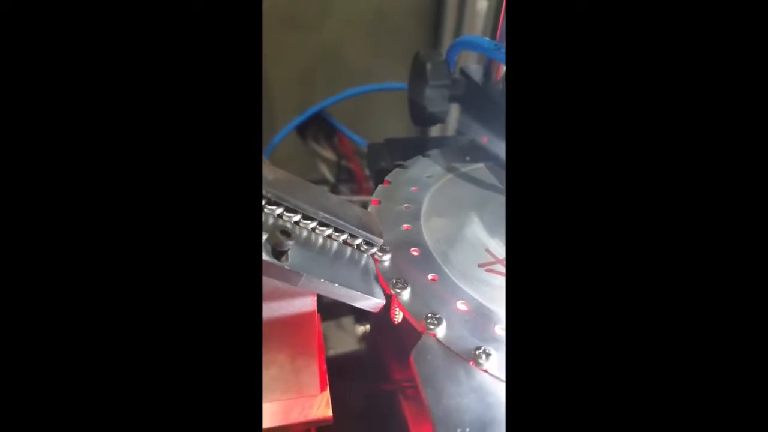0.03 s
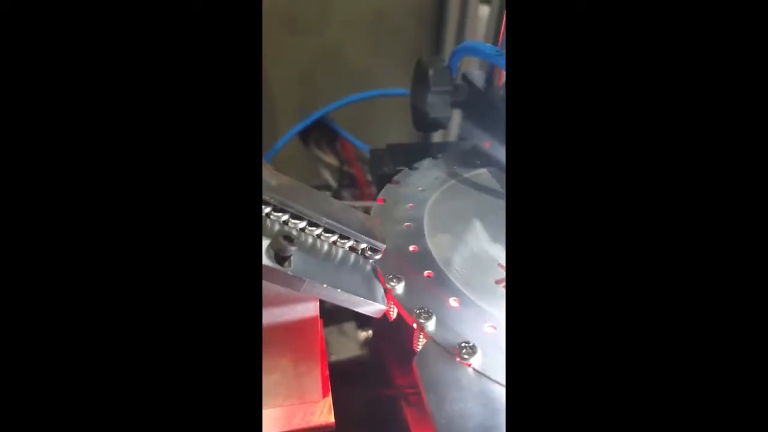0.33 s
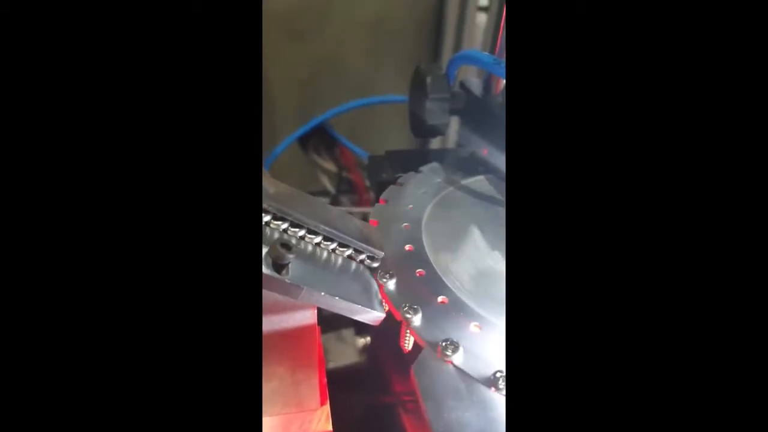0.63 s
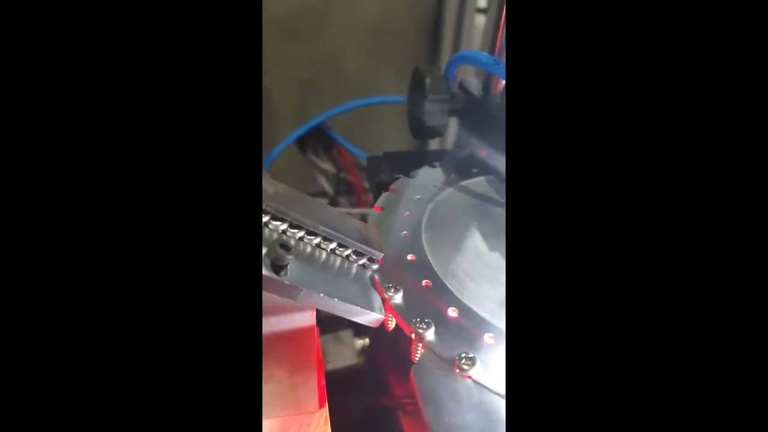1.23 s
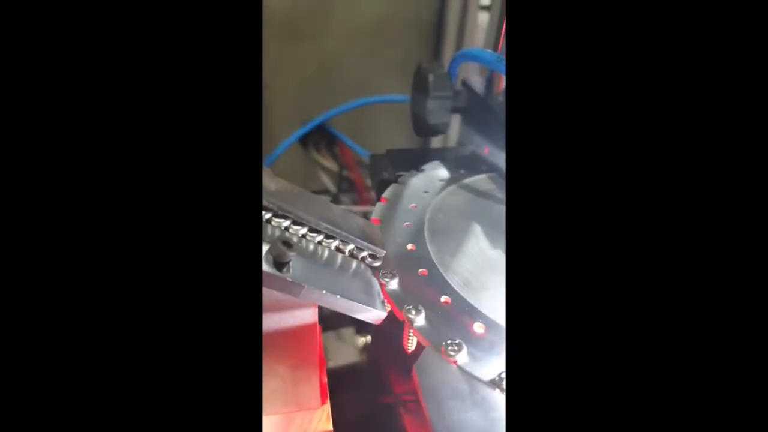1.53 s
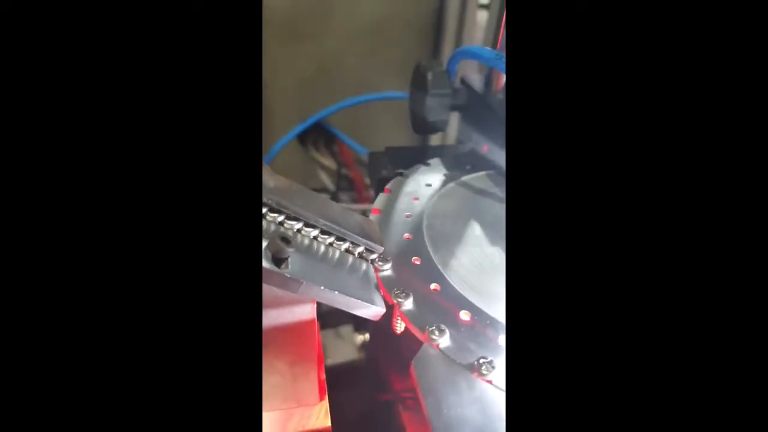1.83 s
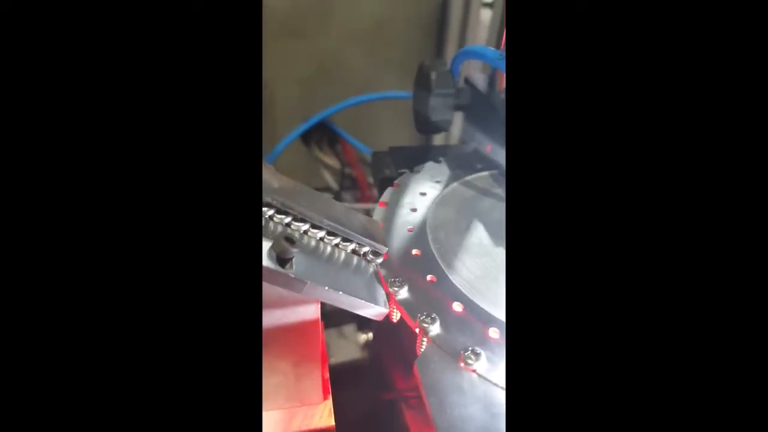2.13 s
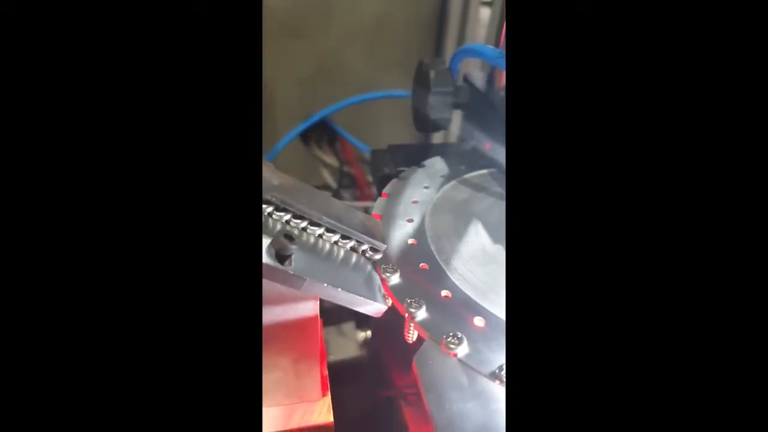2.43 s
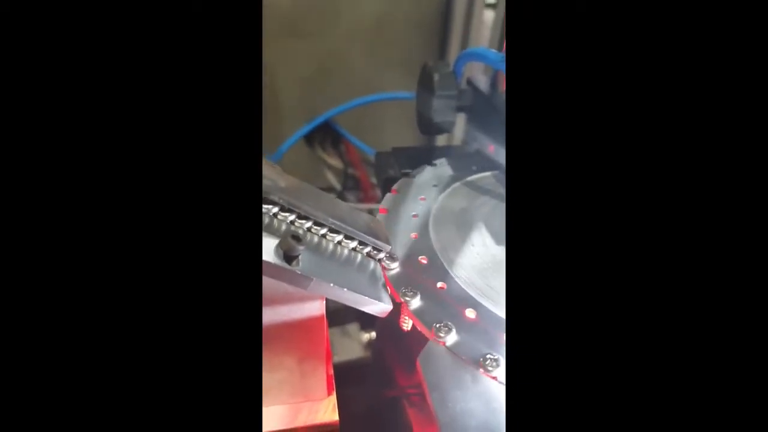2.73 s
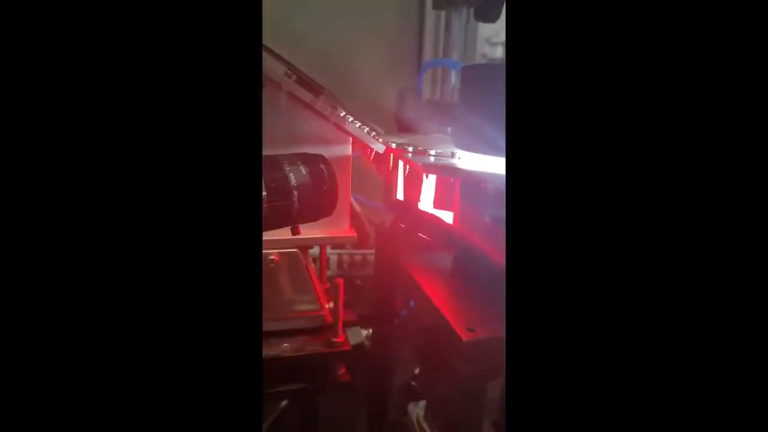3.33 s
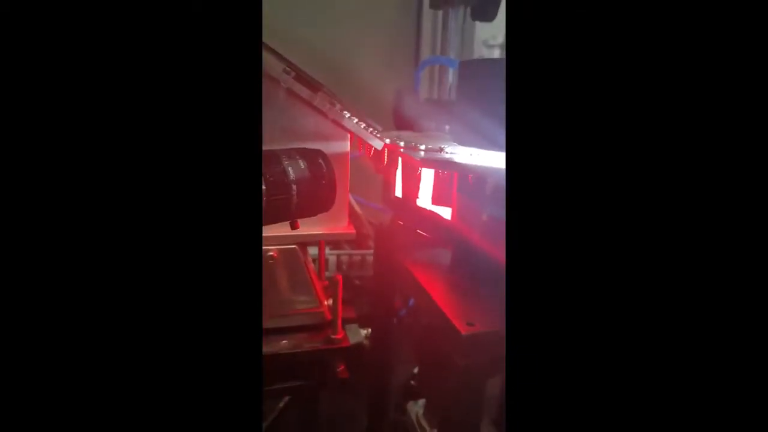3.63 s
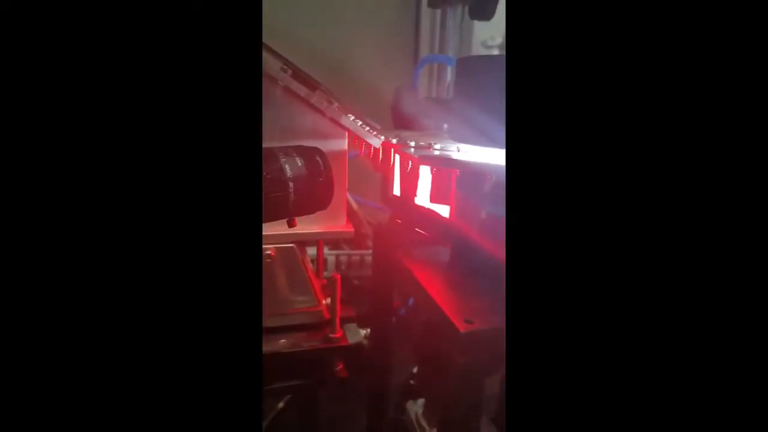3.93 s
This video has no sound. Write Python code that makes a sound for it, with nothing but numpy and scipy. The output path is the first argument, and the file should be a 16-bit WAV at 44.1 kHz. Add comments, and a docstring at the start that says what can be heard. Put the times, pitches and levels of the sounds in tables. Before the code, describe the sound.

A parts-sorting machine hums and throbs close to the microphone, over a rumble and steady rushing air. Sharp air puffs and tiny steel parts clattering into chutes come thickly at first, then sparsely, echoing briefly in the metal housing.

```python
"""The vibrating feeders and the motor of a parts-sorting machine hum and throb, close by.
The throb comes from two tones so near in pitch that they drift in and out of step.
Air jets puff and tiny steel parts clatter into chutes, both echoed by the metal housing.
Behind them the shaken frame rumbles, air rushes and parts shuffle along a track.
At three seconds the whole sound dips briefly."""
import sys
import numpy as np
from scipy import signal
from scipy.fft import rfft, irfft, next_fast_len
from scipy.io import wavfile
from scipy.ndimage import map_coordinates

SR = 44100
rng = np.random.default_rng(int(sys.argv[2]) if len(sys.argv) > 2 else 0)


def transcribe(u):
    """Save the signal u as a 16-bit wav file named by the first command-line argument.

    u: samples, shape (n,) or (channels, n), limited to [-1, 1]; the rate is SR.
    q: integer samples, one column per channel.
    """
    v = np.clip(np.atleast_2d(u).T, -1, 1)
    q = np.round(v * 32767).astype(np.int16)
    wavfile.write(sys.argv[1], SR, q)


N = 176400

# Levels are relative. A fade is the time to drop 60 dB; a rise is the time to climb the last 9 dB.
# loudness of the main feeder, slower feeder, motor and motor's octave (t/s, level/dB)
FEEDER_LEVEL = [(0, -29), (.4, -22), (.62, -32), (1.0, -32), (1.12, -48), (1.4, -51), (1.58, -39),
                (1.92, -40), (2.1, -34.5), (2.32, -25), (2.38, -35.5), (2.5, -29.5), (2.7, -28.5),
                (2.95, -32.5), (3.04, -37.5), (3.45, -47), (3.7, -37), (4, -41)]
SLOW_FEEDER_LEVEL = [(0, -39), (.45, -38), (.62, -24.5), (.98, -28), (1.1, -37.5), (1.45, -39), (1.95, -38),
                     (2.1, -48), (4, -70)]
MOTOR_LEVEL = [(0, -28), (.62, -26.5), (.85, -36.5), (1.05, -39), (1.3, -59), (1.65, -42.5), (2.95, -45),
               (3.04, -34.5), (3.57, -27), (3.61, -35), (4, -39)]
OCTAVE_LEVEL = [(0, -31), (.6, -28.5), (.85, -42), (1.25, -58), (1.6, -36), (1.9, -36.5), (2.3, -32.5),
                (2.39, -43), (2.5, -33.5), (2.95, -34), (3.04, -43.5), (3.55, -36), (3.65, -53), (4, -47)]
# faint steady tones of the frame (f/Hz, level/dB)
FRAME_TONES = [(290.5, -51), (480, -48.5), (600, -56), (692, -58), (1256, -56.5), (1438, -59)]

# short air puffs, and one thin jet that swells more slowly (peak t/s, level/dB, rise/s, fade/s)
PUFF_EVENTS = [(.098, -22.5, 0.0091, 0.14), (.132, -31, .015, 0.07), (.543, -29, .02, 0.097),
               (.9, -26, 0.034, 0.1), (1.063, -21.5, .025, 0.084), (1.092, -19.5, .012, 0.046),
               (1.424, -27.5, 0.012, 0.043), (1.487, -24.5, 0.0064, .15), (1.51, -20, 0.012, 0.071),
               (1.547, -31, 0.013, 0.082), (2.408, -20.5, 0.035, 0.047), (2.443, -26, 0.0088, 0.21),
               (3.611, -18.5, 0.022, 0.06), (3.673, -23.5, 0.0078, 0.045)]
THIN_JET_EVENT = (3.17, -32, .16, .2)
# whistling pitches of the thin jet (f/Hz, level/dB)
JET_WHISTLE = [(7420, -7), (8450, -7), (9200, 1), (10600, -7), (11700, -1)]
# air flow building up and cutting off (peak t/s, level/dB, rise/s)
SURGE_EVENTS = [(.085, -31.5, .03), (.885, -30, .054), (1.02, -31, .048), (2.385, -38, .032),
                (3.57, -34, .06)]
# steel parts hitting the chutes
# (t/s, rattle level/dB, part level/dB, chute level/dB, favoured chute f/Hz, rattle fade/s)
STRIKES = [(.004, -25, -35, -39, 6070, 0.12), (.088, -25, -22.5, -24.5, 6100, .092),
           (.541, -27, -18, -30, 5570, .12), (.586, -21, -34, -42, 4990, .08),
           (.665, -18, -25, -31, 4060, 0.17), (.711, -30, -38, -31, 6070, .09),
           (.858, -25, -18.5, -34, 4060, .12), (.939, -29, -29.5, -35, 7020, .12),
           (1.026, -19, -32, -30, 4060, .14), (1.055, -28, -33, -20.5, 5770, .1),
           (1.133, -24, -36, -32.5, 6070, .08), (1.188, -30, -42, -39, 6070, .079),
           (1.271, -26, -38, -27, 4990, .09), (1.291, -29, -28, -37, 4060, .083),
           (1.339, -32, -32, -43, 7020, .11), (1.502, -34, -44, -31, 5300, .1),
           (1.541, -23.5, -34, -40, 4060, 0.092), (2.394, -28, -29, -22, 6070, .08),
           (2.436, -18, -29, -20, 5300, .07), (2.6, -19.5, -36, -42, 6070, .06),
           (3.861, -30, -38, -46, 4990, .14), (3.888, -35, -44, -46, 4060, .23)]
# bright ring of a steel part, and thin ping of a chute (f/Hz, level/dB, fade/s)
PART_RING = [(6900, -22, .1), (8590, -1, 0.16), (9700, -16, .07), (10770, -8.5, .08), (11450, -6.5, 0.09),
             (13400, -8, 0.073), (14215, -2, 0.068), (14335, -4, 0.072), (15240, -3, .09), (15700, -8, .08)]
CHUTE_RING = [(4060, -3, .09), (4985, 0, .1), (5566, -2, .1), (6070, 0, .11), (6650, -3, .09),
              (7020, -2, .11)]
# tone colour of a puff, a surge and a strike's rattle (f/Hz, level/dB)
PUFF_COLOUR = [(200, -30), (1000, -19), (1800, -3), (2700, -7), (3800, -1), (4400, -3.5), (5400, 1),
               (6100, -2), (7000, 3.5), (8400, 5.5), (12000, 6), (14500, 6), (16000, -10)]
SURGE_COLOUR = [(25, -14), (55, 8.5), (110, -2), (250, -2), (380, 2), (520, -4), (900, -14), (1500, -9),
                (4000, -5.5), (16000, -43)]
RATTLE_COLOUR = [(300, -12), (2000, -15), (4000, 1.5), (5700, -1), (7200, 0), (8700, 5.5), (11000, 4.5),
                 (12200, 1), (14200, 9.5), (16000, -11)]

# loudness of the frame's rumble, deck's drone, air rush and high hiss (t/s, level/dB)
FRAME_LEVEL = [(0, -30), (.48, -32), (.57, -25.5), (.7, -29), (1.02, -31), (1.06, -44), (1.4, -41),
               (2.02, -43), (2.1, -38), (2.9, -40), (3.24, -41), (3.32, -35.5), (3.58, -35.5), (3.62, -44),
               (3.82, -38), (4, -45)]
DRONE_LEVEL = [(0, -34.5), (1.02, -34.5), (1.07, -44), (1.38, -50), (1.58, -41.5), (2.0, -45), (2.25, -38),
               (2.5, -43), (2.85, -43), (3.1, -42.5), (3.57, -35), (3.6, -48), (3.7, -46.5), (3.85, -43.5),
               (4, -47)]
AIR_LEVEL = [(0, -36.5), (.6, -34), (.8, -35.5), (1.03, -35.5), (1.06, -43.5), (1.18, -46), (1.28, -44),
             (1.44, -45), (1.55, -44), (2.08, -45.5), (2.36, -37), (2.5, -44.5), (2.96, -44.5),
             (3.05, -37.5), (3.3, -39.5), (3.5, -34), (3.575, -32), (3.61, -43), (3.74, -43), (3.88, -40),
             (4, -43.5)]
HIGH_HISS_LEVEL = [(0, -35.5), (.4, -39.5), (.55, -34), (.78, -32), (.94, -26), (1.02, -29), (1.16, -36),
                   (2.13, -36), (2.22, -31), (2.47, -36), (2.56, -33.5), (2.96, -37), (3.1, -33.5),
                   (3.26, -34.5), (3.56, -29.5), (3.7, -35), (4, -38.5)]
# tone colour of those four noises and of the air's low roar (f/Hz, level/dB)
FRAME_COLOUR = [(25, -36), (60, -27), (90, -16.5), (115, -5), (135, 4), (160, -6), (190, -3.5), (245, -2),
                (280, -8.5), (305, -26), (345, -60)]
DRONE_COLOUR = [(250, -60), (395, -32), (440, -5), (510, -.5), (570, -1.5), (660, -15), (800, -10),
                (1100, -49)]
AIR_COLOUR = [(40, -33), (100, -4), (250, -3), (315, -14), (395, -13), (450, -1), (600, 0), (800, 3.5),
              (900, 0), (1080, 0), (1350, 3.5), (1900, 1), (3000, 0), (5000, -2.5), (7000, -8),
              (11000, -13), (16000, -29)]
HISS_COLOUR = [(1000, -16.5), (3000, -3), (5000, -1), (6200, -1), (8000, -1), (10200, 0.5), (12000, 0),
               (14300, -1), (16000, -4)]
ROAR_COLOUR = [(200, -40), (290, 0.5), (380, 3), (450, 0.5), (600, -40)]
# pitches of the track as parts shuffle along it (f/Hz, level/dB)
TRACK_RING = [(4990, -5), (6067, -15), (7025, -3.5), (8468, -7), (9440, 1), (10174, 1), (11714, -4),
              (13620, -2), (14293, -3)]

# how long the housing echoes (f/Hz, fade/s)
HOUSING_FADE = [(200, .2), (3000, 0.25), (14000, 0.033)]
# how alike a noise is in both ears (f/Hz, likeness: 1 the same, 0 unrelated)
EAR_LIKENESS = [(40, -0.37), (120, 0.84), (250, 0.62), (500, 0.82), (1000, 0.37), (2200, -0.019)]
# how much louder the left side is than the right (f/Hz, level/dB)
LEFT_OVER_RIGHT = [(120, -0.8), (500, 0.1), (1200, -0.5), (2400, -3.5), (5000, -2.5), (8000, 0),
                   (10000, -3.5), (12500, 0.5), (14300, 2.5), (16000, 6)]
# brief dip in the whole sound (t/s, level/dB)
DIP_LEVEL = [(2.968, 0), (2.99, -19.5), (2.999, -32.5), (3.012, -10), (3.03, 1)]


def hum(feeder_hz=231.9, slow_feeder_hz=209.3, motor_hz=120, feeder_db=-1.5, motor_db=-2.5):
    """Feeders, motor and frame vibrate; the main feeder throbs against the motor's octave."""
    in_step_s = .08  # the two close tones add up to a throb near this time
    motor = amp(motor_db) * level(MOTOR_LEVEL) * tone(motor_hz)
    octave = level(OCTAVE_LEVEL) * tone(2 * motor_hz, in_step_s)
    feeder = amp(feeder_db) * level(FEEDER_LEVEL) * tone(feeder_hz, in_step_s)
    slow_feeder = level(SLOW_FEEDER_LEVEL) * tone(slow_feeder_hz)
    whine = sum(amp(db) * tone(hz) for hz, db in FRAME_TONES)
    return feeder + slow_feeder + motor + octave + whine


def puffs(chute_db=-9, sputter_db=1.0):
    """Each jet swells as its valve opens, makes the chute sing and dies quickly when it shuts."""
    flow = np.sqrt(sum(swell(*puff) ** 2 for puff in PUFF_EVENTS))
    flow *= amp(sputter_db * wobble(300))
    return flow * (noise(PUFF_COLOUR) + amp(chute_db) * singing(CHUTE_RING, width_hz=200))


def thin_jet():
    """A thin jet of air whistles up briefly and fades."""
    return swell(*THIN_JET_EVENT) * singing(JET_WHISTLE, width_hz=200)


def clinks(contacts_per_s=3200, click_share=.52, attack_s=.0014):
    """Each strike is a dying rattle of tiny contacts plus the ring of the part and of the chute."""
    t = np.arange(SR // 5) / SR
    ring, rattle_gain = np.zeros((2, N + SR)), np.zeros(N + SR)
    onset = 1 - np.exp(-t / attack_s)
    for start_s, rattle_db, part_db, chute_db, spot_hz, fade_s in STRIKES:
        start = round(start_s * SR)
        span = slice(start, start + len(t))
        part = amp(part_db) * ringing(PART_RING, t, scatter_db=3)
        chute = amp(chute_db) * ringing(struck_chute(spot_hz), t, scatter_db=2)
        ring[:, span] += onset * (part + chute)
        rattle_gain[span] += amp(rattle_db - 60 * t / fade_s) * onset
    contacts = unit((rng.random(N) < contacts_per_s / SR) * rng.standard_normal((2, N)))
    clicks = unit(filtered(contacts, lambda hz: amp(along(RATTLE_COLOUR, hz))))
    rattle = np.sqrt(click_share) * clicks + np.sqrt(1 - click_share) * noise(RATTLE_COLOUR)
    return ring[:, :N] + rattle_gain[:N] * rattle


def struck_chute(spot_hz, db_per_octave=28):
    """The spot that is hit favours one of the chute's pitches; those further from it ring less."""
    return [(hz, db - db_per_octave * abs(np.log2(hz / spot_hz)), fade_s)
            for hz, db, fade_s in CHUTE_RING]


def surges(fade_s=.09):
    """The air flow builds, then stops short with a low bump."""
    return sum(swell(*surge, fade_s) for surge in SURGE_EVENTS) * noise(SURGE_COLOUR)


def frame(rumble_db=2, deck_db=2.5):
    """The shaken frame rumbles and its deck drones near 500 Hz."""
    rumble = amp(rumble_db) * level(FRAME_LEVEL) * noise(FRAME_COLOUR)
    drone = amp(deck_db) * level(DRONE_LEVEL) * noise(DRONE_COLOUR)
    return rumble + drone


def air(rush_db=5, roar_db=-46, hiss_db=.5):
    """Moving air makes a broad rush, a low roar and a high hiss."""
    flow = level(AIR_LEVEL)
    roar = amp(roar_db) * unit(flow ** 1.8) * noise(ROAR_COLOUR)  # grows 1.8 dB per dB of rush
    rush = amp(rush_db) * flow * noise(AIR_COLOUR)
    hiss = amp(hiss_db) * level(HIGH_HISS_LEVEL) * noise(HISS_COLOUR)
    return rush + roar + hiss


def jostle(gain_db=-9.5):
    """Shuffling parts keep the track faintly ringing, rising and falling with the hiss."""
    return amp(gain_db) * level(HIGH_HISS_LEVEL) * singing(TRACK_RING, width_hz=48)


def walls(x, echo_db, spread_s, count=18):
    """Close metal panels add weak, quick echoes, different at each ear."""
    echoes = np.zeros((2, SR // 20))
    for ear in echoes:
        delays = (spread_s * rng.uniform(.15, 1, count) * SR).astype(int)
        ear[delays] = amp(echo_db) * rng.choice([-1, 1], count) / np.sqrt(count)
        ear[0] = 1  # the direct sound
    return signal.fftconvolve(x, echoes / np.linalg.norm(echoes[0]), axes=1)[:, :N]


def housing(x):
    """Echoes inside the housing blur into a short tail whose highs die first."""
    hz, t, bands = signal.stft(rng.standard_normal((2, SR // 3)), SR, nperseg=256)
    fade = amp(-60 * t / along(HOUSING_FADE, hz)[:, None])
    tail = signal.istft(bands * fade, SR, nperseg=256)[1]
    return signal.fftconvolve(x, tail / np.linalg.norm(tail[0]), axes=1)[:, :N]


def tone(hz, crest_s=0, flutter_db=1, drift_rad=.12):
    """A pure tone that wavers slightly in loudness and pitch."""
    flutter = amp(flutter_db * wobble(12))
    phase = 2 * np.pi * hz * (clock() - crest_s) + drift_rad * wobble(6.08)
    return np.sqrt(2) * flutter * np.cos(phase)


def ringing(pitches, t, scatter_db, roughness=.29, detune=.002):
    """Struck metal rings in fading tones, a little different for each strike and each ear."""
    hz, db, fade_s = np.transpose(pitches)[:, :, None]
    hz = hz * (1 + detune * rng.standard_normal(hz.shape))
    size, phase = rng.standard_normal((2, 2, len(pitches), 1))
    steps = rng.standard_normal((len(pitches), len(t)))
    blur = roughness * np.cumsum(steps, axis=1) / np.sqrt(SR / 200)  # makes each tone less pure
    gain = amp(db - 60 * t / fade_s + scatter_db * size)
    return (gain * np.sin(2 * np.pi * hz * t + np.pi / 2 * phase + blur)).sum(axis=1)


def singing(pitches, width_hz):
    """Stereo noise narrowed to a few ringing pitches."""
    def peaks(f):
        damping = 1j * f * width_hz
        return sum(amp(db) * damping / (hz * hz - f * f + damping) for hz, db, *_ in pitches)
    return unit(filtered(rng.standard_normal((2, N)), peaks))


def noise(colour):
    """Noise of a given tone colour, partly shared by the ears and partly opposite."""
    def shape(hz):
        angle = np.arccos(along(EAR_LIKENESS, hz)) / 2
        return amp(along(colour, hz)) * np.array([np.cos(angle), np.sin(angle)])
    shared, opposite = filtered(rng.standard_normal((2, N)), shape)
    return unit(np.array([shared + opposite, shared - opposite]))


def swell(peak_s, db, rise_s, fade_s):
    """A gain that grows to a peak and then dies away."""
    before = np.maximum(peak_s - clock(), 0)
    after = np.maximum(clock() - peak_s, 0)
    return amp(db - 9 * before / rise_s - 60 * after / fade_s)


def filtered(x, response):
    """Turn each frequency of x up or down by response(hz)."""
    size = next_fast_len(N + SR // 4)
    hz = np.fft.rfftfreq(size, 1 / SR)
    return irfft(rfft(x, size) * response(hz), size)[..., :N]


def wobble(per_s):
    """A smooth curve through per_s random values a second."""
    return map_coordinates(rng.standard_normal(1024), [clock() * per_s], mode="wrap")


def level(rows):
    """A gain for each sample from (t/s, level/dB) rows."""
    return amp(np.interp(clock(), *np.transpose(rows)))


def along(rows, hz):
    """Read between (f/Hz, value) rows, with octaves evenly spaced."""
    row_hz, values = np.transpose(rows)
    return np.interp(np.log(hz + 1), np.log(row_hz + 1), values)


def clock():
    """The time of each sample in seconds."""
    return np.arange(N) / SR


def unit(x):
    """Scale to an average strength (rms) of 1."""
    return x / np.sqrt(np.mean(x ** 2) + 1e-20)


def amp(db):
    """Decibels to gain."""
    return 10 ** (np.asarray(db) / 20)


def scene(puff_db=2.5, clink_db=3.5, air_db=2, housing_db=-9):
    """Mix the humming machine, its air flow and its echoing bursts, then balance left and right."""
    machine = hum() + frame() + surges()
    steady = walls(amp(air_db) * (air() + jostle()), echo_db=-5, spread_s=.012)
    bursts = amp(puff_db) * (puffs() + thin_jet()) + amp(clink_db) * clinks()
    near = walls(bursts, echo_db=-3, spread_s=.004)  # panels right beside the chutes
    mix = machine + steady + near + amp(housing_db) * housing(bursts)
    sides = np.array([[.5], [-.5]])
    return filtered(mix, lambda hz: amp(along(LEFT_OVER_RIGHT, hz) * sides))


def record(dry, top_hz=15900):
    """The level dips once, and the very highest treble is cut off."""
    return filtered(dry * level(DIP_LEVEL), lambda hz: hz < top_hz)


dry = scene()
out = record(dry)
transcribe(out)
```